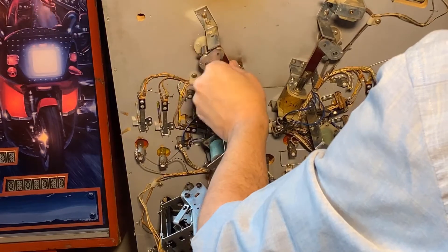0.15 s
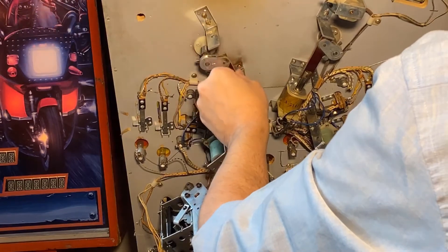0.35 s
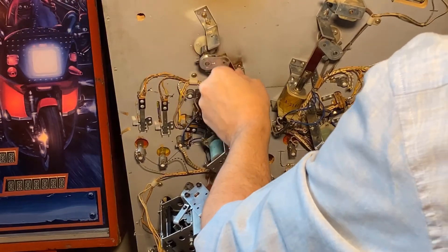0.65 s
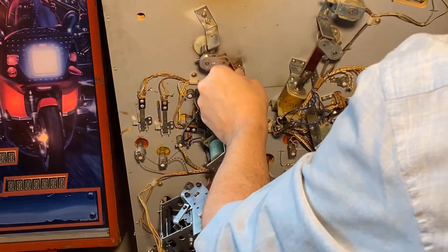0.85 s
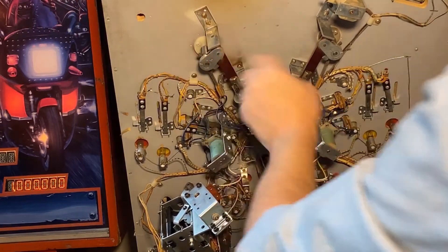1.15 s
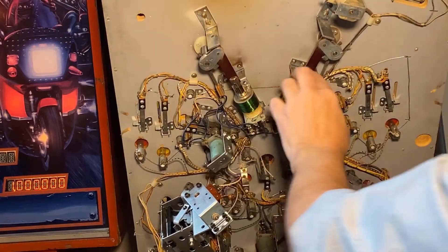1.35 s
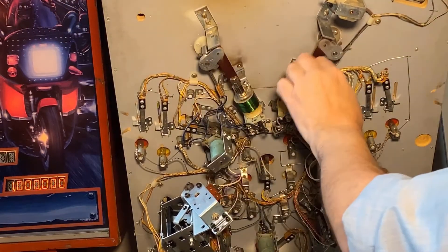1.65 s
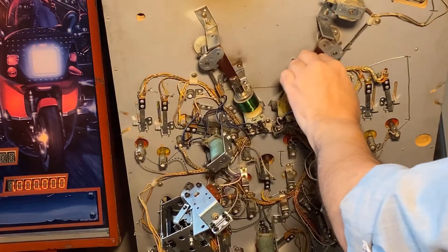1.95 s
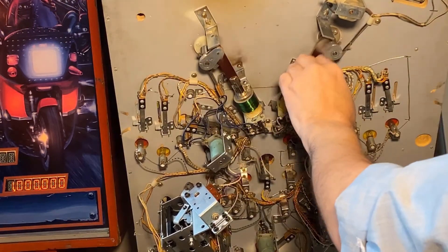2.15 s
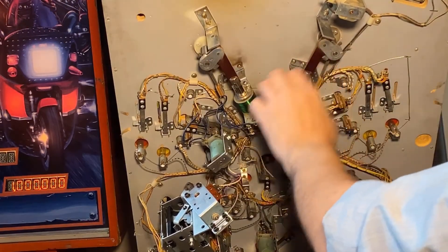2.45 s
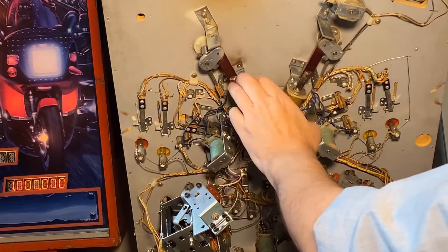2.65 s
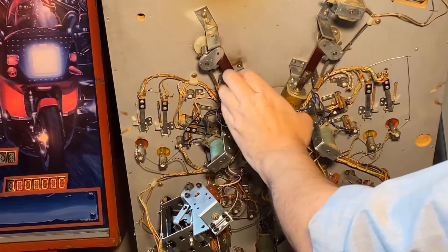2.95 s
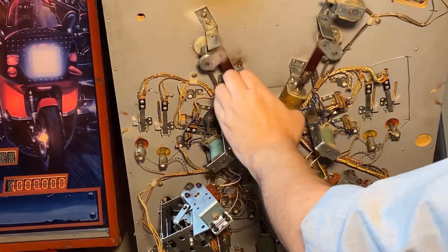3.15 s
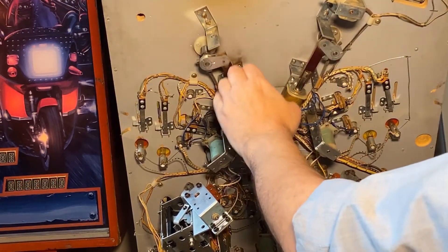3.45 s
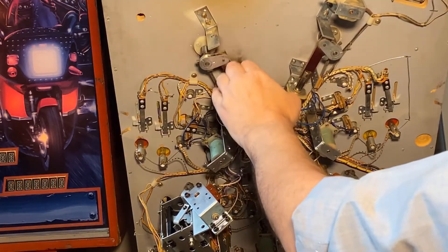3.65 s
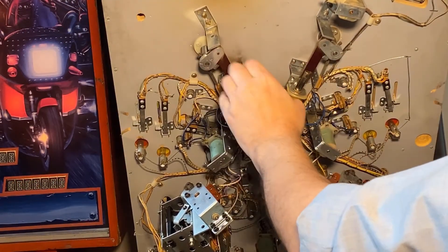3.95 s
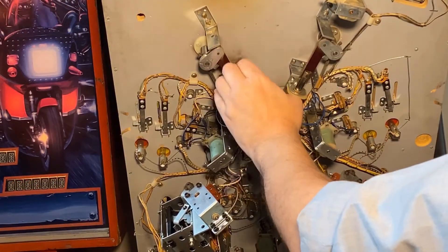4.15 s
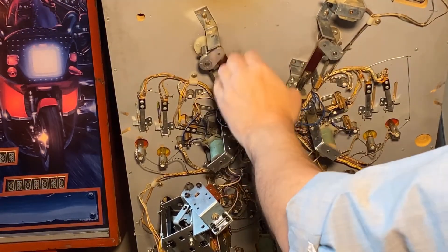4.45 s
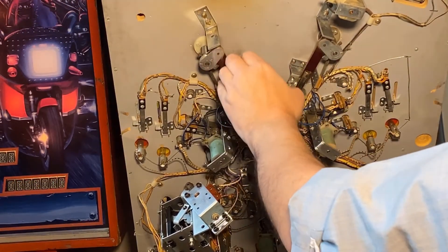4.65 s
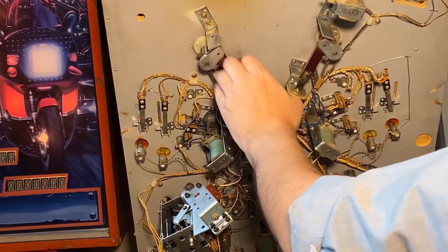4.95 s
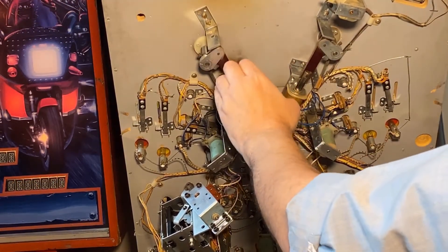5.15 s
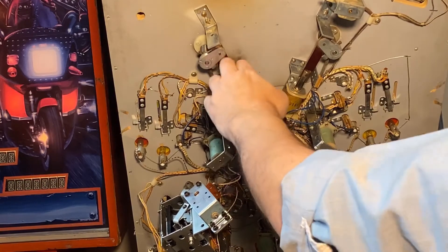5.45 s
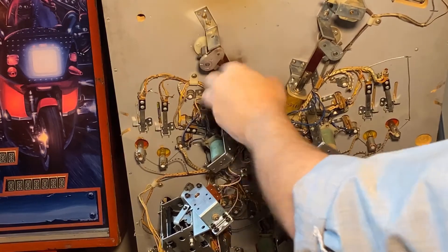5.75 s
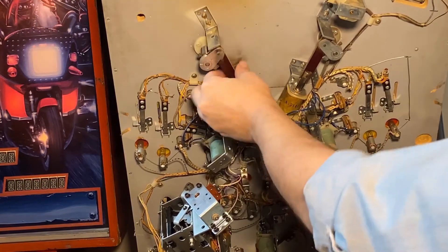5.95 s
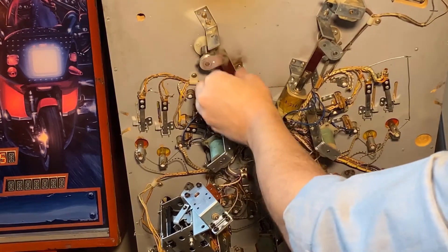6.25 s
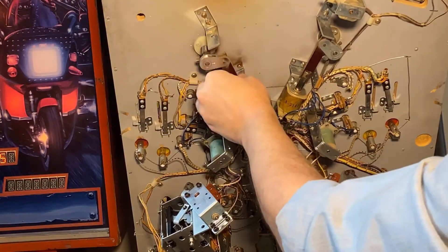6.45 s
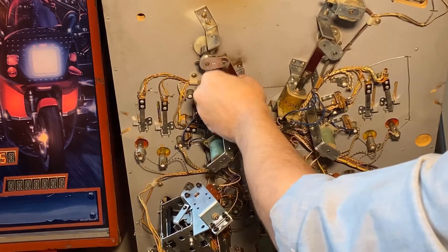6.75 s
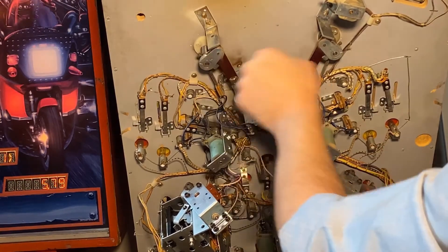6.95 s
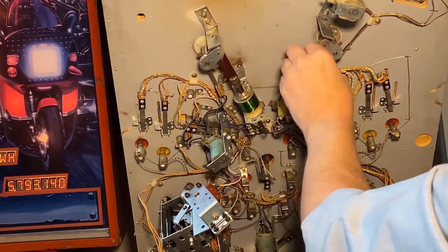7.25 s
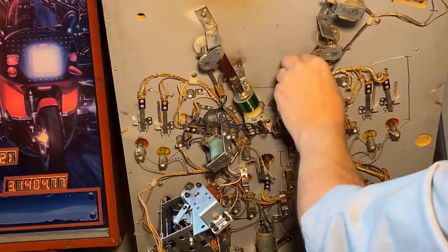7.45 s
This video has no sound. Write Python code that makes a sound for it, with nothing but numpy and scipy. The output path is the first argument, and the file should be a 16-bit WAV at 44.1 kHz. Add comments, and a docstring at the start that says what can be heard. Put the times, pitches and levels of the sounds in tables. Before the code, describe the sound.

Mechanical linkages on the underside of a wooden board are moved by hand: paired bright clacks, in and back, ringing briefly with loose chatter. A left one starts slowly, a right one follows in a quick run, the left resumes, and the right ends it. Between them are tiny ticks, soft taps and grainy finger friction. The microphone on clothing is bumped once and rumbles faintly in a small workshop.

```python
"""A small workshop, a wooden playfield: a hand works two pinball flipper linkages under the board.
Each plunger clacks into its coil stop and back onto its rest: a short random force rings filtered modes.
Loose parts tick, fingertips tap hollow notes, and fingers scuff the board as grainy coloured noise.
The microphone, worn on a shirt, takes one sharp knock, low decaying jolts, some cloth rub, rumble and
the slow sway of the arm. Walls answer each contact with a decaying noise tail; steady room air lies below."""
import sys
import numpy as np
from scipy import signal
from scipy.fft import rfft, irfft, next_fast_len
from scipy.io import wavfile
from scipy.ndimage import map_coordinates

SR = 44100
rng = np.random.default_rng(int(sys.argv[2]) if len(sys.argv) > 2 else 0)


def gain_from_db(level_db):
    """Turn a decibel level (scalar or array-like) into a linear amplitude factor."""
    decades = np.asarray(level_db, float) / 20
    return 10 ** decades


def bounce(signal):
    """Save signal as a 16-bit WAV file at the path given by the first command-line argument."""
    frames = np.transpose(np.atleast_2d(signal))
    limited = np.clip(frames, -1, 1)
    pcm = np.round(limited * 32767).astype(np.int16)
    wavfile.write(sys.argv[1], SR, pcm)


N = 335138  # length in samples


def unit(x):
    """Scales a signal to rms 1."""
    return x / np.sqrt(np.mean(x ** 2) + 1e-20)


def along(points, hz):
    """Reads (f/Hz, value) points on a logarithmic frequency axis."""
    f, v = np.transpose(points)
    return np.interp(np.log(hz + 1), np.log(f + 1), v)


def wobble(rate):
    """A smooth random curve with rate knots a second."""
    knots = rng.standard_normal(int(N * rate / SR) + 4)
    return map_coordinates(knots, [np.arange(N) * rate / SR])


def filtered(x, response):
    """Passes x through a complex response of frequency."""
    m = 2 * next_fast_len(len(x) // 2 + 4096)  # even length, padded with silence
    return irfft(rfft(x, m) * response(np.fft.rfftfreq(m, 1 / SR)), m)[:len(x)]


def noise(spectrum):
    """Steady random sound of rms 1, coloured by (f/Hz, relative level/dB) points."""
    return unit(filtered(rng.standard_normal(N), lambda hz: gain_from_db(along(spectrum, hz))))


def causal(spectrum):
    """Minimum-phase response with the given (f/Hz, level/dB) magnitude: nothing sounds before the blow."""
    def response(hz):
        cepstrum = irfft(np.log(gain_from_db(along(spectrum, hz))))
        half = len(cepstrum) // 2
        cepstrum[1:half] *= 2
        cepstrum[half + 1:] = 0
        return np.exp(rfft(cepstrum))
    return response


def modes(table, scatter_db):
    """Causal sum of damped resonances of alternating sign, each at a newly drawn strength."""
    new = rng.normal(0, scatter_db, len(table))

    def response(f):
        total = 0
        for k, (centre, width, db) in enumerate(table):
            damping = 1j * f * width
            total = total + (-1) ** k * gain_from_db(db + new[k]) * damping / (centre ** 2 - f ** 2 + damping)
        return total
    return response


def add(track, s, x):
    """Mixes x into the track from time s."""
    track[round(s * SR):][:len(x)] += x


# how long the workshop rings: f/Hz, t60/s
ROOM_DECAY = [(200, 0.54), (400, 0.28), (1000, 0.33), (2800, 0.31), (7300, 0.28), (14000, 0.27)]
# what its walls send back: f/Hz, level/dB
WALL_COLOUR = [(300, 9), (2000, 2.5), (8000, -5.5), (14000, -11.5)]


def room(direct, spread, wet_db):
    """Direct sound plus a fresh tail of what spreads to the walls; each frequency dies at its own speed."""
    hz, t, z = signal.stft(rng.standard_normal(SR // 2), SR, nperseg=256)
    fading = z * gain_from_db(-60 * t / along(ROOM_DECAY, hz)[:, None])
    tail = signal.istft(fading, SR, nperseg=256)[1][:SR // 2]
    tail = np.pad(tail / np.linalg.norm(tail), (round(.003 * SR), 0))  # 3 ms behind the direct sound
    tail = filtered(tail, causal(WALL_COLOUR))
    out = gain_from_db(wet_db) * signal.fftconvolve(spread, tail)
    out[:len(direct)] += direct
    return out


# where the tilt of a blow is set, the second band being the reference: f/Hz
TILT_BANDS = (500, 1700, 4500, 8500, 13500)


def blows(events, body, chatter_db, chatter_t60, wet_db, air_db):
    """A sharp contact and a short chatter of the loose link ring the body; where it lands tilts the balance."""
    track, t = np.zeros(N + SR), np.arange(SR // 10) / SR
    dense, peaks = body
    impulse = 1. * (t == 0)
    same_share = .42  # part of the energy to the walls that rings just as the direct sound does
    for s, db, low, upper, high in events:
        contact = gain_from_db(-60 * t / .004) * rng.standard_normal(len(t))
        sparse = np.prod(rng.standard_normal((2, len(t))), axis=0)  # uneven micro-contacts
        chatter = gain_from_db(chatter_db - 60 * t / chatter_t60) * sparse
        onset = 1 - np.exp(-t / 0.00019)  # the faces seat within a fraction of a millisecond
        force = onset * (contact + chatter)
        dense_modes = causal(dense)
        lone_modes = modes(peaks, scatter_db=2)
        body_response = lambda hz: dense_modes(hz) + gain_from_db(-10) * lone_modes(hz)
        ring = filtered(force, dense_modes) + gain_from_db(-10) * filtered(force, lone_modes)
        # summed over all directions the blow has the body's own colour
        even = filtered(impulse, body_response)
        air = air_db + high / 2  # the top follows the treble halfway
        tilt = causal(list(zip(TILT_BANDS, (low, 0, upper, high, air))))
        direct, even = (filtered(gain_from_db(db) * x / np.linalg.norm(x), tilt) for x in (ring, even))
        spread = np.sqrt(same_share) * direct + np.sqrt(1 - same_share) * even
        add(track, s, room(direct, spread, wet_db))
    return track[:N]


# the still air of the workshop: f/Hz, relative level per Hz/dB
AIR_COLOUR = [(15, -35.5), (25, -5.5), (38, -33), (146, -29.5), (167, -37), (238, -4), (288, -22),
              (1470, -24.5), (1600, -25.5), (1730, -50), (2900, -40.5), (15200, -43), (16500, -63)]


def room_air():
    """Steady coloured noise under the whole take, at -65 dB rms."""
    return gain_from_db(-65) * noise(AIR_COLOUR)


# fingers over board and wiring: f/Hz, relative level per Hz/dB
SCUFF_COLOUR = [(200, -6), (350, -1.5), (600, -4), (1300, -9.5), (2500, -18.5), (5000, -25), (12000, -39)]
# how hard they scuff, before the grain: t/s, level/dB
SCUFF_LEVEL = [(0, -67), (.85, -64), (.92, -56.5), (1.05, -59.5), (2.5, -61), (2.72, -65), (2.95, -68),
               (3.05, -66), (3.15, -54.5), (3.6, -61), (4.05, -67.5), (4.6, -58.5), (4.75, -61.5),
               (4.9, -67.5), (5.4, -68), (6, -58), (7.05, -58.5), (7.6, -57.5)]


def scuffing():
    """Friction noise of fingers on board and wiring, its level wandering slowly and in fast grains."""
    level = np.interp(np.arange(N) / SR, *np.transpose(SCUFF_LEVEL))
    slow, grain = 1.6 * wobble(8.1), 2.9 * wobble(120)  # dB
    return gain_from_db(level + slow + grain) * noise(SCUFF_COLOUR)


# low rumble at the shirt microphone: f/Hz, relative level per Hz/dB
RUMBLE_COLOUR = [(15, -15), (30, 6), (70, -2), (200, -1.5), (400, -39.5)]
# the shirt heaves and the rumble swells: middle t/s, added level/dB, time to fall to 1/e either side/s
SHIRT_HEAVES = [(1.5, -55, 0.25), (2.24, -64.5, 0.24), (3.297, -72.5, .15), (4.337, -60, 0.1),
                (4.857, -63.5, 0.12), (5.413, -59.5, 0.23), (6.1, -64, 0.18), (6.78, -65.5, .15),
                (7.6, -59, 0.13)]


def rumble():
    """Low noise at the worn microphone, swelling in a bell-shaped curve with each heave of the shirt."""
    now = np.arange(N) / SR
    level = gain_from_db(-71)  # between heaves
    for s, db, half in SHIRT_HEAVES:
        level = level + gain_from_db(db) * np.exp(-((now - s) / half) ** 2)
    return level * gain_from_db(wobble(7.9)) * noise(RUMBLE_COLOUR)


def arm_sway():
    """The slow sway of the arm reaches the microphone as noise of a few hertz."""
    return gain_from_db(-45.5) * noise([(1, -17.5), (2.5, 1.0), (5, -6.5), (14, -37.0), (40, -89.0)])


# what loose parts ring with: dense modes as f/Hz, level/dB; then those that
# stand out as f/Hz, width/Hz, level/dB (before scatter and a common 10 dB cut)
LOOSE_PARTS = ([(170, -24.5), (500, 2.5), (1400, -1.5), (3000, -12), (5000, -5), (9000, -11), (16000, -27)],
                [(605, 240, -3.5), (1490, 370, -0.5), (2300, 340, -10), (4730, 460, -25), (8600, 850, 0)])
# bounces and touches of loose parts: t/s, energy before tilt/dB,
# tilt at 500 Hz/dB, at 4.5 kHz/dB, at 8.5 kHz/dB
LOOSE_TICKS = [(0.2554, -24.5, -16, 7, 9), (0.6084, -24.5, 0.5, -2, -1), (0.7228, -15.5, -1, -7, -14),
               (0.8714, -19, -3, 3, -4), (1.4324, -8, -21, -7, 3), (1.5349, -17.5, -5, -2, 4),
               (2.2164, -3, -23, -11, -4), (2.2924, 7.5, -8, -6, -12.5), (2.3297, -17, -16, -10, -2),
               (2.59, -16, -6, -8, -4), (2.6334, -17.5, -4.5, -1, -10), (2.6978, -23.5, -6, -10, -13),
               (2.7144, -27.5, 11, -5.5, -9), (2.8324, -23.5, -3, -14, -10), (2.9118, -15, -4.5, -9, -3),
               (2.9647, -11.5, -12, -13, -34), (3.2984, -8, -4.5, -11, -29), (3.4705, -13, -1, -24, -23),
               (3.5513, -26.5, -13, -10, -7), (3.5932, -17, 0, -11, -20), (3.9789, -19, -9, -6, 1.5),
               (4.337, -13.5, -14.5, -18, -14.5), (4.4054, -14, -26, -25, -20), (4.6593, -26, -7, -8, -4),
               (4.72, -27, -1, 3, 4), (4.7282, -19.5, 5, -7, -8), (4.802, -24, -6, -12, -10),
               (4.8883, -19.5, -8, -3, -8), (5.5594, -15.5, -2, -4.5, -6.5), (5.641, -4.5, -21, 8, 3),
               (5.953, -34, -12, 6.5, 3), (5.9678, -33, -1, 4, -6), (6.2944, -7.5, -43, -16, -6),
               (6.566, -9, -3.5, -3, -3.5), (6.7694, -22.5, 11.5, 7, 5), (7.1044, -13.5, 3.5, 6, -3),
               (7.1467, -7, -1.5, -8, -24), (7.2504, -31, -10, 0, 8)]


def loose_ticks():
    """Loose parts bounce and touch, small contacts ringing light bodies."""
    return blows(LOOSE_TICKS, LOOSE_PARTS, chatter_db=-6.5, chatter_t60=0.057, wet_db=-3.5, air_db=-22)


# colour of the slack: tilt at 500 Hz/dB, at 4.5 kHz/dB, at 8.5 kHz/dB
SLACK_COLOUR = (-6.5, 1.8, 2.4)


def slack():
    """Before each pull lands the link takes up its play: a tick 11.5 ms earlier and 30.5 dB weaker."""
    events = [(s - .0115, db - 30.5, *SLACK_COLOUR) for s, db, *_ in LEFT_PULL_BLOWS + RIGHT_PULL_BLOWS]
    return blows(events, LOOSE_PARTS, chatter_db=-0.5, chatter_t60=0.063, wet_db=-3.5, air_db=-2.0)


# left coil stop, board and bracket together: modes in the columns of LOOSE_PARTS
LEFT_STOP_BODY = ([(100, -40.5), (170, -28.5), (457, -8), (1020, -11), (1350, -1), (1800, -11), (2730, -7),
                   (4000, -13.5), (5400, -16.5), (7000, -12.5), (8200, -6), (9800, -7), (11500, -18),
                   (14000, -18), (16000, -42)], [(1110, 210, 7.5), (1500, 80, -12.5), (1567, 20, -18),
                   (2650, 70, -11), (2650, 70, -12.5), (3000, 50, -13.5), (8100, 600, 1.5)])
# left plunger into its stop: t/s, energy before tilt/dB,
# tilt at 500 Hz/dB, at 4.5 kHz/dB, at 8.5 kHz/dB
LEFT_PULL_BLOWS = [(0.2816, 5.5, -3, -1.5, -3.5), (0.7859, 1, 2.5, 8.5, 7.5), (3.1223, 11.5, -12, -6, -7),
                   (4.2475, 10.5, -10, -6.5, -6), (5.4479, 10.5, -3, 3, 0), (6.0764, 10, -9.5, -6, -5.5),
                   (6.3902, 0, -5.5, 8.5, -2.5), (6.64, 14, -7, -0.5, -7)]


def left_pulls():
    """The left plunger, pulled in, clacks into its coil stop and rings board and bracket."""
    return blows(LEFT_PULL_BLOWS, LEFT_STOP_BODY, chatter_db=-16.5, chatter_t60=0.055, wet_db=-3.5, air_db=-4.8)


# left rest, board and bracket together: modes in the columns of LOOSE_PARTS
LEFT_REST_BODY = ([(100, -44), (170, -18), (542, 2), (1040, -2), (1540, 1), (1760, -1.5), (2300, 3.5),
                   (3240, -8), (3630, -5), (7060, -7), (16000, -27)], [(583, 43, 7.5), (1268, 29, -31.5),
                   (1495, 11, -7.5), (2550, 77, 3), (3980, 72, -27), (5500, 120, -6), (5200, 54, -4.5),
                   (7090, 89, -20.5)])
# left plunger back onto its rest: t/s, energy before tilt/dB,
# tilt at 500 Hz/dB, at 4.5 kHz/dB, at 8.5 kHz/dB
LEFT_RETURN_BLOWS = [(0.4839, -11.5, 3, -1, 1), (0.9632, 4.5, 2, 2, 4), (3.331, 4, -7, -12, 4.5),
                     (3.711, 5.5, -1.5, -1, 1), (4.3819, 8.5, -2, 2, 1), (5.6051, 8.5, -3, 2.5, 2.5),
                     (6.2315, 2, -3.5, 0, -0.5), (6.8088, 11, -5, -0.5, -1)]


def left_returns():
    """The left plunger, let back, lands on its rest with a longer chatter of the link."""
    return blows(LEFT_RETURN_BLOWS, LEFT_REST_BODY, chatter_db=-5.5, chatter_t60=0.087, wet_db=-2.0, air_db=-4.5)


# fingertips on the board or a bracket: t/s, energy before tilt/dB, note f/Hz
FINGER_TAPS = [(.713, -20, 660), (0.8967, -12.5, 536), (2.59, -24.5, 644), (2.79, -27.5, 800),
               (2.925, -20, 560), (4.1071, -27, 845), (4.802, -20.5, 756), (5.1446, -27.5, 835),
               (6.057, -21, 750), (6.566, -11, 2160), (7.1467, -15.5, 660), (7.2904, -21.5, 674)]


def taps():
    """Soft fingertip contacts: little treble, the board or bracket answering with one broad hollow note."""
    total = np.zeros(N)
    for s, db, hz in FINGER_TAPS:
        dense = [(hz / 2, -14), (hz, 0), (2 * hz, -22), (16000, -60)]
        body = dense, [(hz, hz / 6, 3)]
        total += blows([(s, db, 0, 0, 0)], body, chatter_db=-5.5, chatter_t60=.06, wet_db=-3, air_db=-1.5)
    return total


# resonances of the microphone capsule: f/Hz, width/Hz, relative level/dB
CAPSULE_MODES = [(6290, 290, 18.5), (2020, 520, -25), (4450, 4900, 4.5)]
# the microphone's clasp after the knock: f/Hz, starting level/dB, t60/s
CLASP_RING = (2030, -52.5, .25)


def knock():
    """One sharp knock on the worn microphone rings its capsule and, more faintly, its clasp."""
    track, t = np.zeros(N + SR), np.arange(SR // 5) / SR
    knock_s = 1.2203
    tick = filtered(gain_from_db(-60 * t / .0012), modes(CAPSULE_MODES, scatter_db=0))
    tick = filtered(tick, causal([(9000, 26), (14000, -66)]))  # the cloth muffles the top
    add(track, knock_s, gain_from_db(-14.5) * tick / np.abs(tick).max())
    hz, db, t60 = CLASP_RING
    add(track, knock_s, gain_from_db(db - 60 * t / t60) * np.sin(2 * np.pi * hz * t))
    return track[:N]


# the shirt jolts the capsule: t/s, starting level/dB, f/Hz
SHIRT_JOLTS = [(1.22, -27, 57), (1.222, -18.5, 130), (1.251, -24.5, 199), (1.275, -27, 60),
               (1.308, -29.5, 85.8), (1.335, -29, 75), (1.462, -26, 143), (1.752, -34, 122),
               (4.448, -34, 80.4), (5.48, -38, 71), (5.968, -26, 158)]


def jolts():
    """The shirt jolts the capsule: low sine swings that die by 60 dB in 2.2 cycles."""
    track, t = np.zeros(N + SR), np.arange(SR // 5) / SR
    for s, db, hz in SHIRT_JOLTS:
        add(track, s, -gain_from_db(db - 60 * t * hz / 2.2) * np.sin(2 * np.pi * hz * t))
    return track[:N]


# cloth over the capsule: start t/s, end t/s, level at the end/dB
CLOTH_RUBS = [(1.222, 1.39, -62), (5.168, 5.331, -73), (5.819, 5.976, -71)]


def cloth_rub():
    """Cloth rubs the capsule as a narrow treble hiss, each rub growing by 7 dB and then dying in 60 ms."""
    now, level = np.arange(N) / SR, np.zeros(N)
    for start, end, db in CLOTH_RUBS:
        times, levels = (start, end, end + .06), (db - 7, db, db - 13)
        level += gain_from_db(np.interp(now, times, levels, left=-120, right=-120))
    return level * noise([(5000, -34.5), (6000, -11), (6500, 5.5), (7000, -7), (8500, -24.0), (16000, -67.5)])


# right coil stop, board and bracket together: modes in the columns of LOOSE_PARTS
RIGHT_STOP_BODY = ([(100, -39), (170, -13.5), (923, -5.5), (1350, 2), (1490, 0.5), (2530, -4.5),
                    (2950, -10), (3630, 2), (4230, -3.5), (8710, -9), (16000, -24)], [(1410, 26, -6),
                    (1720, 130, -2), (2670, 520, -3), (3470, 130, -4.5), (3950, 45, -14), (4824, 210, 12.5),
                    (5730, 69, -29), (7290, 39, -10.5)])
# right plunger into its stop: t/s, energy before tilt/dB,
# tilt at 500 Hz/dB, at 4.5 kHz/dB, at 8.5 kHz/dB
RIGHT_PULL_BLOWS = [(1.4027, 6.7, 0.5, -3.5, -3.5), (1.7498, 2.9, 1, -10, -2.5), (2.004, 8.6, -4.5, -2, -3),
                    (2.1899, 10, -3.5, -10.5, -1.5), (7.3744, 5.46, -2.5, 0, 7)]


def right_pulls():
    """The right plunger, pulled in, clacks into its coil stop with a strong chatter of the link."""
    return blows(RIGHT_PULL_BLOWS, RIGHT_STOP_BODY, chatter_db=-3.5, chatter_t60=0.057, wet_db=-2.5, air_db=1.5)


# right rest, board and bracket together: modes in the columns of LOOSE_PARTS
RIGHT_REST_BODY = ([(100, -64.5), (170, -24.5), (475, -2.5), (923, -4.5), (1120, 0), (2440, -1), (3240, -9),
                    (4480, -7), (8540, -13.5), (14000, -32.5), (16000, -54)], [(1170, 37, -10.5),
                    (1291, 21, -13), (1890, 27, -17), (2460, 51, -3), (4380, 540, 1.5), (4420, 61, -6),
                    (5360, 37, -1.5), (5880, 87, -12.5)])
# right plunger back onto its rest: t/s, energy before tilt/dB,
# tilt at 500 Hz/dB, at 4.5 kHz/dB, at 8.5 kHz/dB
RIGHT_RETURN_BLOWS = [(1.5813, 6.05, -1, 0, -1), (1.8742, 3, 0, -3.5, -4), (2.1036, 3.9, -2, -3, -6),
                      (2.2874, 4.64, -12.5, 2.5, -4), (7.5208, 12.5, -4, -0.5, 1.5)]


def right_returns():
    """The right plunger, let back, lands on its rest and rings it."""
    return blows(RIGHT_RETURN_BLOWS, RIGHT_REST_BODY, chatter_db=-10.5, chatter_t60=0.064, wet_db=-2.5, air_db=2.6)


def scene():
    """Everything at the shirt microphone, in one channel."""
    workshop = room_air() + scuffing()
    flippers = left_pulls() + left_returns() + right_pulls() + right_returns()
    small_contacts = loose_ticks() + slack() + taps()
    shirt = rumble() + arm_sway() + knock() + jolts() + cloth_rub()
    return (workshop + flippers + small_contacts + shirt)[None]


def roll_off(x):
    """The treble ends steeply here."""
    return signal.sosfilt(signal.butter(12, 17010, fs=SR, output="sos"), x)


def record(dry):
    """The recorder's input softly rounds off the highest peaks."""
    top = .88  # full scale is 1
    rounded = dry / (1 + np.abs(dry / top) ** 4) ** (1 / 4)
    return roll_off(rounded)


dry = scene()
out = record(dry)
bounce(out)
```